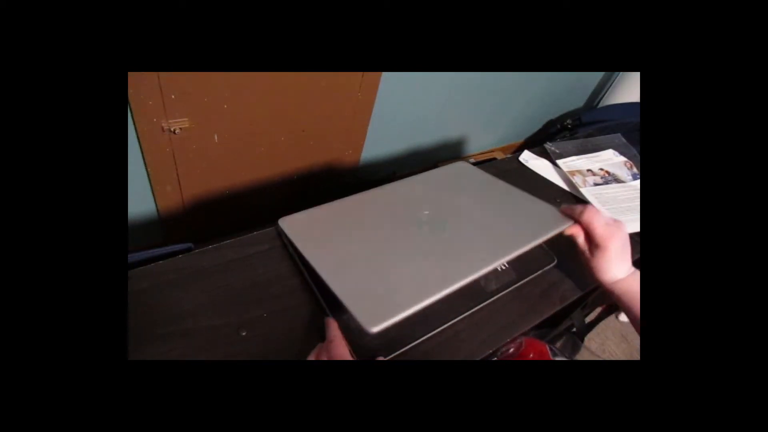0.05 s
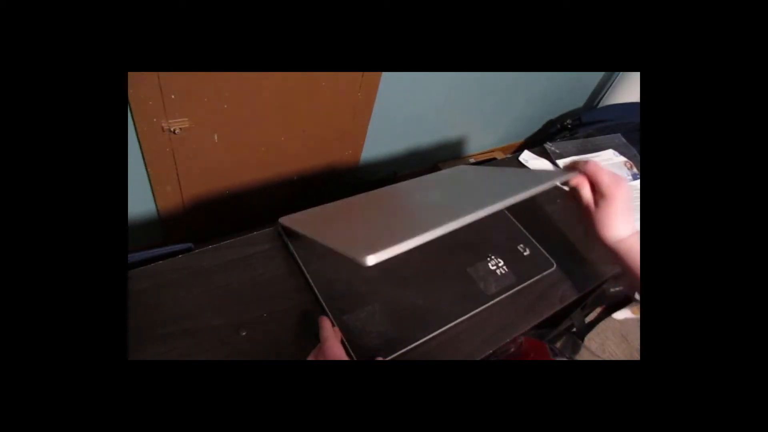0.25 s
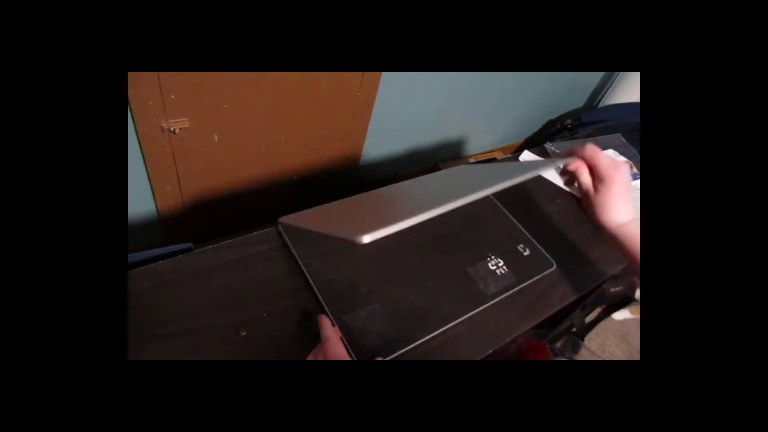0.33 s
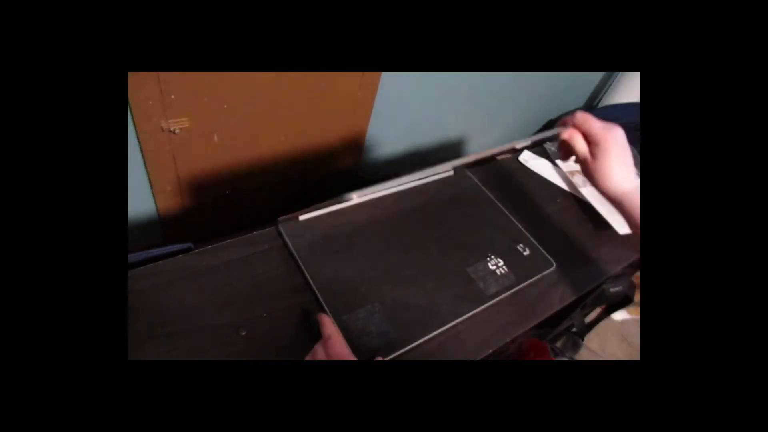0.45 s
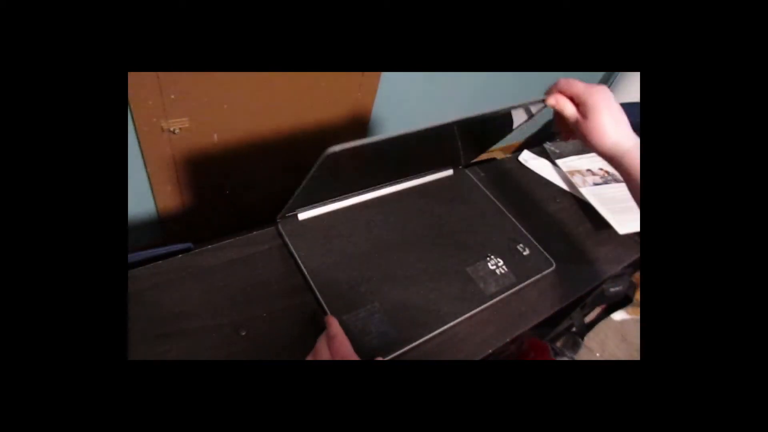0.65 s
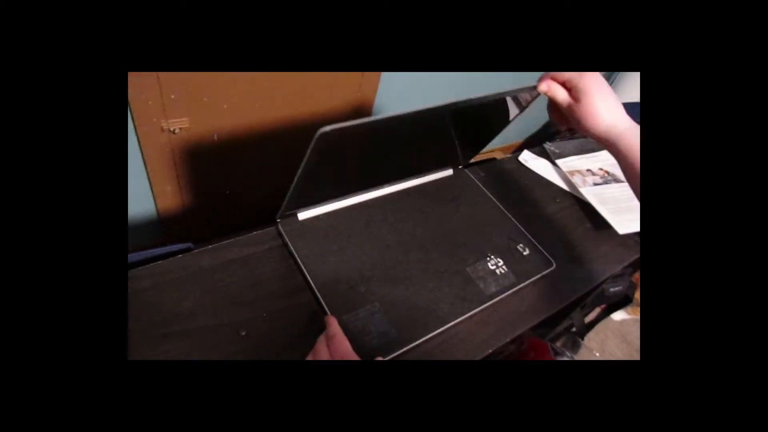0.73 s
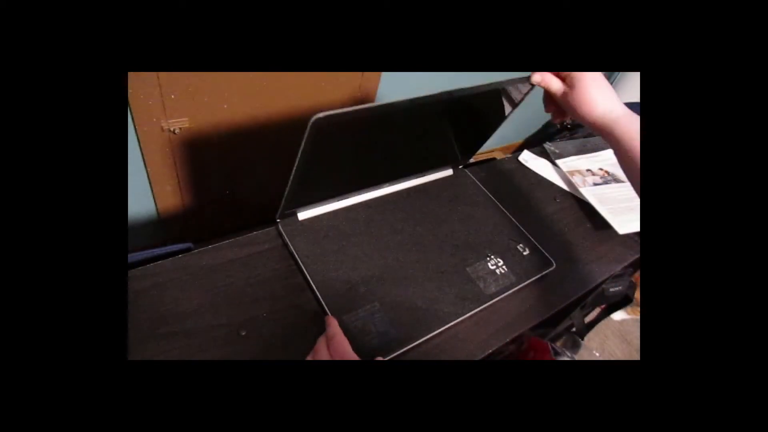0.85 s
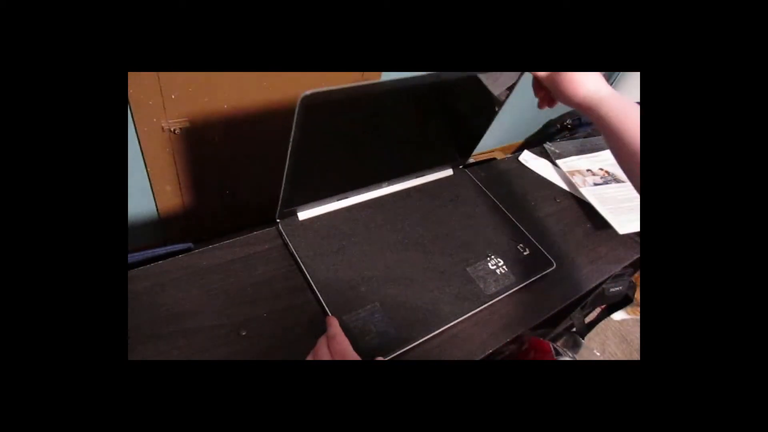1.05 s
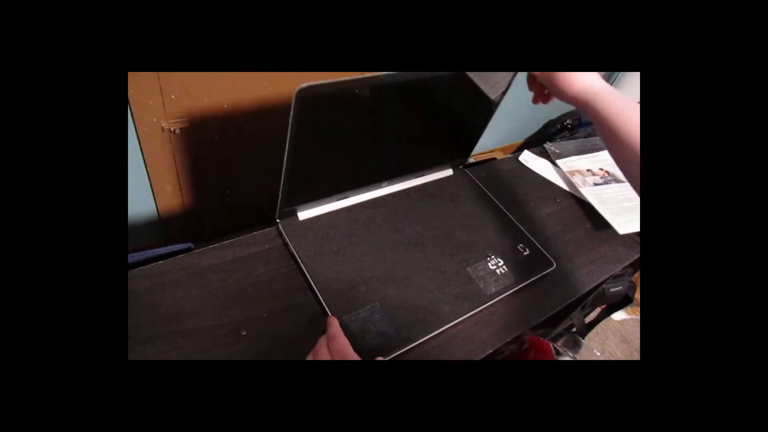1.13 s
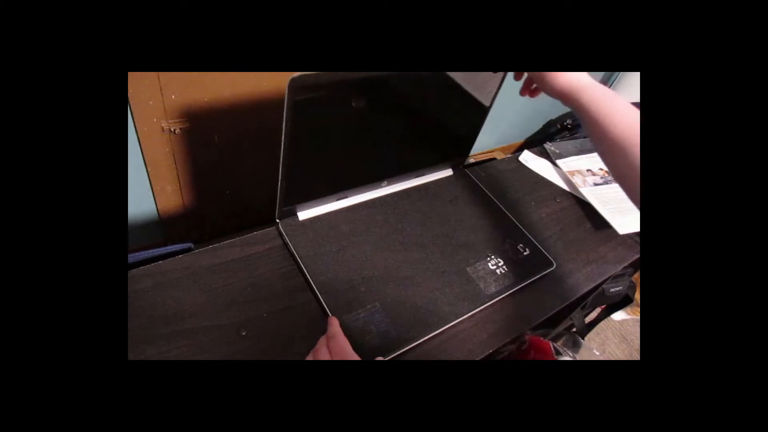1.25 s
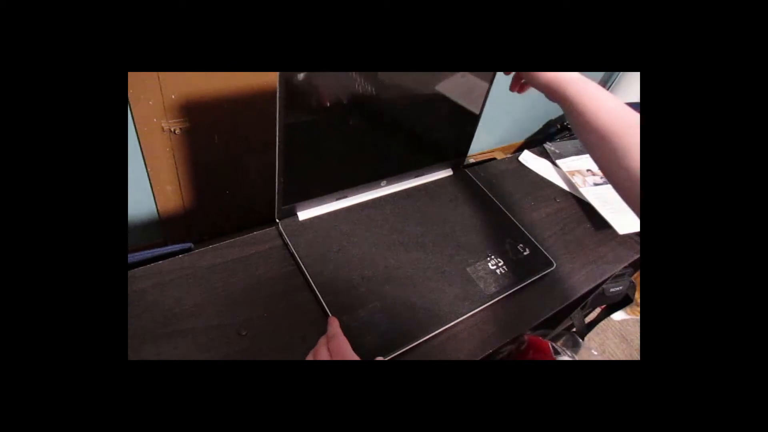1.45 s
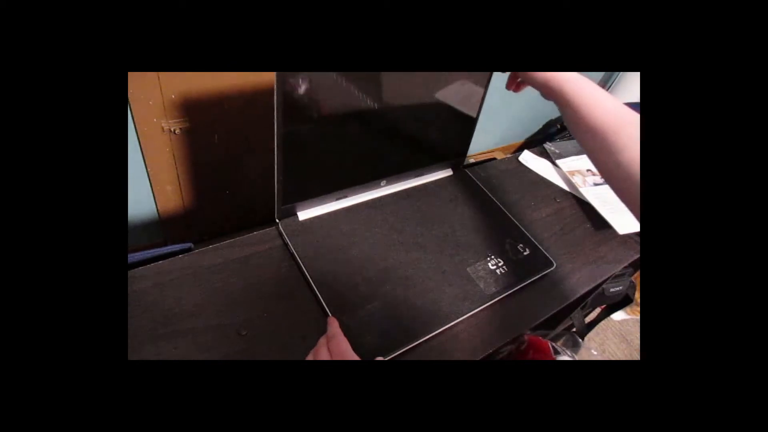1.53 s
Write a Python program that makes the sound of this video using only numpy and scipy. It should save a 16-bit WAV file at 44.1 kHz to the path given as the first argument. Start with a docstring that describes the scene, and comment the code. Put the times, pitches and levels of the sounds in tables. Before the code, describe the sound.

A short knock as a laptop lid is lifted open, then faint hinge ticks.

```python
"""A laptop on a wooden desk is opened by hand in a small, quiet room.
First there is a steady hush of room air and microphone hiss, then two faint ticks.
At about 0.2 s the lid lets go with a click, and the case knocks on the desk and settles once.
Case and desk ring briefly, and the room echoes them.
Then hinge and fingers tick faintly as the lid rises, while the hush goes on to the end."""
import sys
import numpy as np
from scipy import signal
from scipy.fft import rfft, irfft
from scipy.io import wavfile

SR = 44100
rng = np.random.default_rng(int(sys.argv[2]) if len(sys.argv) > 2 else 0)


def materialize(psi):
    """Save the field psi as 16-bit PCM at rate SR to the path in sys.argv[1].

    A 1-D psi becomes a single channel; in a 2-D psi each row is a channel.
    """
    bounded = np.clip(np.atleast_2d(psi).T, -1, 1)
    quanta = np.round(bounded * 32767).astype(np.int16)
    wavfile.write(sys.argv[1], SR, quanta)


N = 70560  # 1.6 s

# Tone colour of the air and hiss: pitch_hz, relative_level_db
HUSH_COLOUR = [(20, -30), (31, -25), (40, -3.5), (60, -10), (90, -3.5), (170, -5.5), (250, -5.5), (480, -6),
               (620, -10), (1000, -14.5), (2000, -19), (2800, -22.5), (3900, -30.5), (5000, -28),
               (7000, -29.5), (10000, -38.5), (12700, -47.5), (14500, -59)]
# Stereo width of the air and hiss: pitch_hz, side_minus_mid_db
HUSH_WIDTH = [(60, 2), (110, 6), (200, 11.5), (370, 6.5), (680, 6), (1240, 3.5), (2280, 1.5), (4180, 0),
              (7660, 0.5), (14000, 0.5)]
# Narrow resonances that hum in the room: pitch_hz, width_hz, level_db
HUM_NOTES = [(135.6, 20, -64), (297.4, 26, -66), (515, 28, -61)]
# The room's echo against the direct sound: pitch_hz, level_db, fade_s (time to fall by 60 dB)
ECHO_BANDS = [(102, 0, 0.55), (202, -5, 0.42), (394, -13, .21), (880, -5.5, 0.24), (2000, -6.5, 0.14),
              (4900, -5, 0.23), (12100, -10, 0.092)]
# Stereo width of the echo: pitch_hz, side_minus_mid_db
ECHO_WIDTH = [(100, -9), (300, -13), (700, -11), (2000, -9.5), (6000, 2.5)]
# Slips of hinge and fingers: start_s, level_db, lid_db, tilt_db_per_octave, ring_hz, ring_db
SLIPS = [(0.117, -55.5, -69, 0, 6070, -57.5), (0.177, -53.5, -56, -4, 2000, -62),
         (0.6046, -55, -67, 4, 8540, -58.5), (0.6979, -51, -72, 2.5, 5430, -63),
         (1.0402, -47.5, -60, -3.5, 6900, -54), (1.0689, -45, -69, 0, 2430, -50),
         (1.1035, -53, -76, -3, 2020, -63), (1.5272, -48, -49, 1, 3320, -59)]
# Tone colour of a tick: pitch_hz, relative_level_db
TICK_COLOUR = [(500, -9), (1500, -7), (2500, 6), (4200, -2), (6300, 2.5), (8500, -6), (12000, -16),
               (15000, -24)]
# Contacts of the knock: start_s, push_db, contact_ms (longer is duller), crack_db
CONTACTS = [(0.2087, -0.7, 0.25, -37.5), (0.2113, 5, 0.64, -37), (0.219, -9.5, 0.78, -54),
            (0.2247, -21, 0.22, -42), (0.2737, -14.5, 1.25, -70), (0.2778, -15.5, 0.63, -68),
            (0.2936, -15, 1.43, -78)]
# Notes at which case and desk ring: pitch_hz, relative_level_db, fade_s
CASE_AND_DESK_NOTES = [(200.6, -33, 0.16), (215, -20.5, 0.029), (253, -39.5, 0.066), (293, -11.5, 0.0091),
                       (405, -9, .01), (496, -19.5, 0.051), (620, -32, 0.047), (806.2, -8.5, 0.0348),
                       (813.4, -7.5, 0.0305), (918.6, -23.5, 0.045), (1074.6, -39.5, 0.074),
                       (1325, -32, 0.049), (1588, -24, 0.016), (2037, -19.5, 0.029), (2413, -32, 0.036),
                       (2700, -29, 0.022)]
# Tone colour of the plastic crack: pitch_hz, relative_level_db
CRACK_COLOUR = [(500, 5), (2000, -1), (3000, -0.5), (4000, -15), (5400, -12), (6700, -5), (8000, -11),
                (10000, -15.5), (13000, -25), (14000, -41)]

HUSH_DB = -54
ECHO_DELAY_S, ECHO_BUILD_S = 0.007, 0.0012
TICK_FADE_S, SECOND_SLIP_S, SECOND_SLIP_DB = 0.011, 0.003, -2
LID_HZ, LID_WIDTH_HZ, LID_FADE_S = 760, 1300, 0.063
RING_FADE_S, RING_WIDTH_SHARE = 0.025, 0.16  # width as a share of the ring's pitch
CRACK_FADE_S, BASS_CUT_HZ = 0.031, 168
TREBLE_CUT_HZ = 14800

TIME_S = np.arange(N) / SR
SPECTRUM_HZ = np.arange(N // 2 + 1) * SR / N


def gain_of(db):
    """Turn decibels into a number to multiply by."""
    return 10 ** (np.asarray(db) / 20)


def lookup(table, hz, column=1):
    """Read a table at any pitch, blending between its rows."""
    rows = np.array(table, float)
    return np.interp(np.log(np.maximum(hz, 1)), np.log(rows[:, 0]), rows[:, column])


def bell(hz, width_hz):
    """A bell-shaped tone colour that peaks at one pitch."""
    return 1 / (1 + ((SPECTRUM_HZ - hz) / (width_hz / 2)) ** 2)


def fade(fade_s):
    """A level that falls by 60 dB every fade_s seconds."""
    return np.exp(-np.log(1000) * TIME_S / fade_s)


def delay(sound, delay_s):
    """The same sound, later."""
    return np.interp(np.arange(N) - delay_s * SR, np.arange(N), sound, left=0)


def stereo(mid, side):
    """Left and right from what they share (mid) and how they differ (side)."""
    return np.array([mid + side, mid - side])


def noise(colour):
    """Steady noise of strength 1; colour is a gain for each frequency."""
    phases = np.exp(2j * np.pi * rng.random(N // 2 + 1))
    sound = irfft(colour * phases, N)
    return sound / np.std(sound)


def burst(colour, fade_s, start_s):
    """A puff of coloured noise that starts suddenly and dies away."""
    puff = delay(rng.choice([-1., 1.], N) * fade(fade_s), start_s)
    return irfft(rfft(puff) * colour, N) / np.sqrt(np.mean(colour ** 2))


def room_air():
    """Room air and microphone hiss make a steady hush; three resonances hum faintly."""
    colour = gain_of(lookup(HUSH_COLOUR, SPECTRUM_HZ))
    side_colour = colour * gain_of(lookup(HUSH_WIDTH, SPECTRUM_HZ))
    side_gain = np.linalg.norm(side_colour) / np.linalg.norm(colour)
    hush = stereo(noise(colour), side_gain * noise(side_colour))
    hum = np.zeros((2, N))
    for hz, width_hz, db in HUM_NOTES:
        hum += gain_of(db) * np.array([noise(bell(hz, width_hz)) for _ in range(2)])
    return gain_of(HUSH_DB) * hush + hum


def room_echo(sound):
    """Sound bounces off desk and walls in a dense blur; the bass lingers longest."""
    echo = np.zeros((2, N))
    for hz in 62.5 * 2 ** np.arange(0, 8.1, .5):  # bands half an octave apart
        octaves = np.log2(np.maximum(SPECTRUM_HZ, 1) / hz)
        band = np.cos(np.pi / 2 * np.clip(2 * octaves, -1, 1))
        shape = fade(lookup(ECHO_BANDS, hz, column=2)) * (1 - np.exp(-TIME_S / ECHO_BUILD_S))
        tails = [delay(noise(band) * shape, ECHO_DELAY_S) for _ in range(2)]
        mid, side = (tail * np.sqrt(np.mean(band ** 2) / np.sum(tail ** 2)) for tail in tails)
        side *= gain_of(lookup(ECHO_WIDTH, hz))
        echo += gain_of(lookup(ECHO_BANDS, hz)) * stereo(mid, side)
    return signal.fftconvolve(sound[None], echo, axes=1)[:, :N]


def hinge_and_finger_ticks():
    """Hinge or fingers slip twice in a row; the lid sounds hollow and the slipping spot rings."""
    ticks = np.zeros(N)
    octaves = np.log2(np.maximum(SPECTRUM_HZ, 500) / 5000)
    for start_s, db, lid_db, tilt, ring_hz, ring_db in SLIPS:
        colour = gain_of(lookup(TICK_COLOUR, SPECTRUM_HZ) + tilt * octaves)
        first = burst(colour, TICK_FADE_S, start_s)
        second = gain_of(SECOND_SLIP_DB) * burst(colour, TICK_FADE_S, start_s + SECOND_SLIP_S)
        ticks += gain_of(db) * (first + second)
        ticks += gain_of(lid_db) * burst(bell(LID_HZ, LID_WIDTH_HZ), LID_FADE_S, start_s)
        ticks += gain_of(ring_db) * burst(bell(ring_hz, ring_hz * RING_WIDTH_SHARE), RING_FADE_S, start_s)
    return ticks


def case_knock():
    """Each contact sets case and desk ringing and gives off a short plastic crack."""
    ring, knock = np.zeros(N), np.zeros(N)
    # Neighbouring notes swing against each other, so the thud swells just after the click.
    for k, (hz, db, fade_s) in enumerate(CASE_AND_DESK_NOTES):
        ring += (-1) ** k * gain_of(db) * fade(fade_s) * np.sin(2 * np.pi * hz * TIME_S)
    # Deep bass passes poorly into the air.
    ratio = 1j * SPECTRUM_HZ / BASS_CUT_HZ
    ring_spectrum = rfft(ring) * ratio ** 2 / (1 + np.sqrt(2) * ratio + ratio ** 2)
    crack_colour = gain_of(lookup(CRACK_COLOUR, SPECTRUM_HZ))
    for start_s, push_db, contact_ms, crack_db in CONTACTS:
        push = 1 / (1 + 1j * SPECTRUM_HZ * contact_ms / 1000) ** 4
        knock += gain_of(push_db) * delay(irfft(ring_spectrum * push, N), start_s)
        knock += gain_of(crack_db) * burst(crack_colour, CRACK_FADE_S, start_s)
    return knock


def scene():
    """The laptop straight ahead, the room around it."""
    laptop = case_knock() + hinge_and_finger_ticks()
    return laptop + room_echo(laptop) + room_air()


def record(dry):
    """Cut away the highest treble."""
    return signal.sosfilt(signal.ellip(8, .2, 70, TREBLE_CUT_HZ, fs=SR, output="sos"), dry)


dry = scene()
out = record(dry)
materialize(out)
```